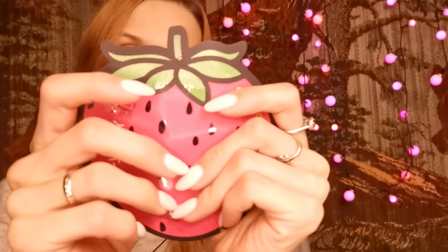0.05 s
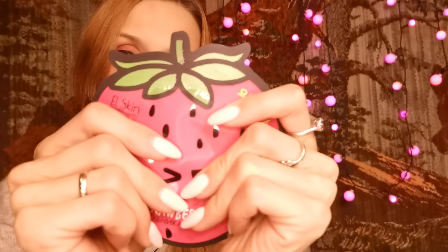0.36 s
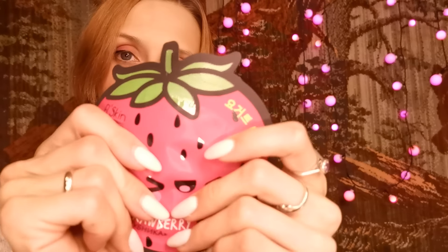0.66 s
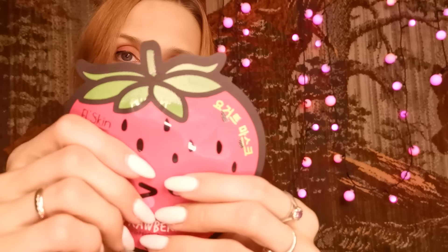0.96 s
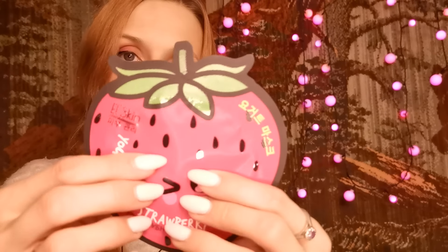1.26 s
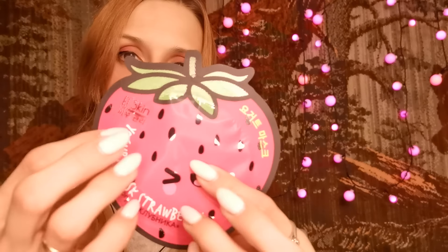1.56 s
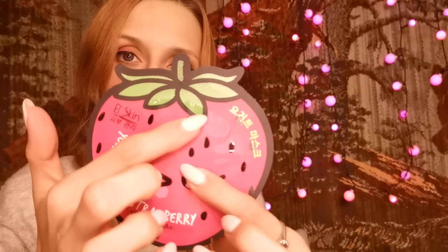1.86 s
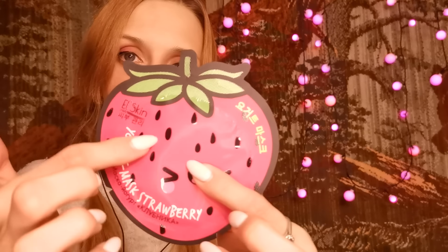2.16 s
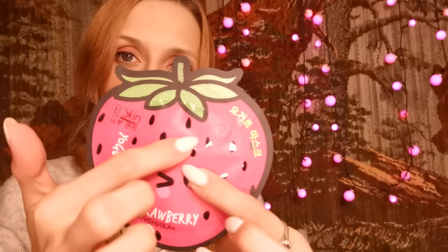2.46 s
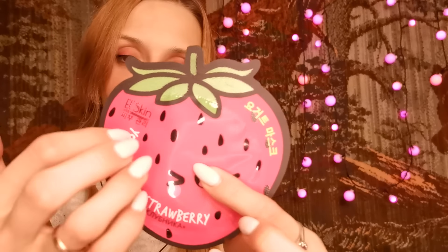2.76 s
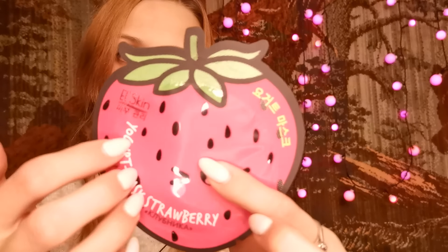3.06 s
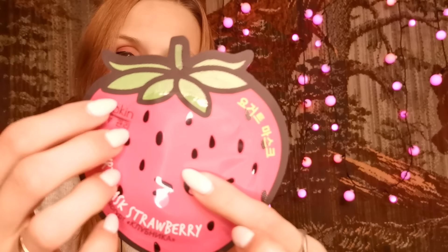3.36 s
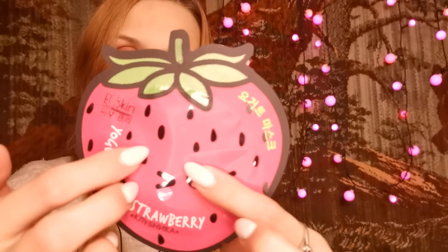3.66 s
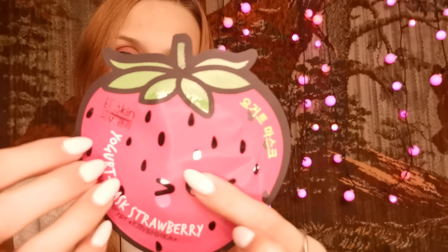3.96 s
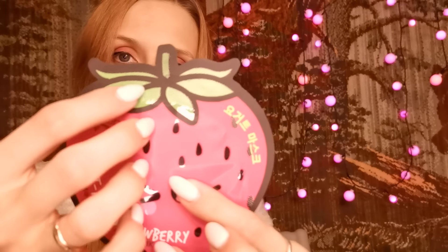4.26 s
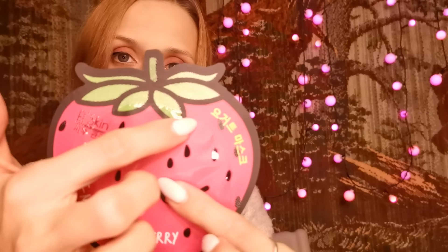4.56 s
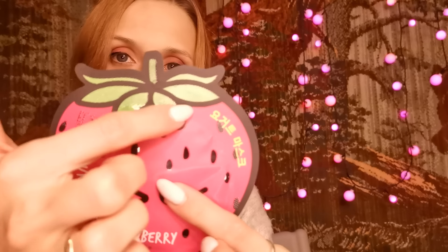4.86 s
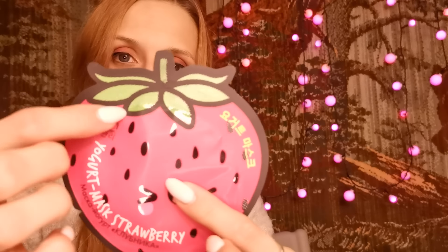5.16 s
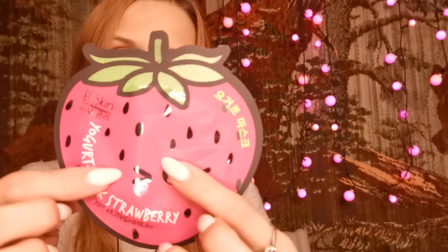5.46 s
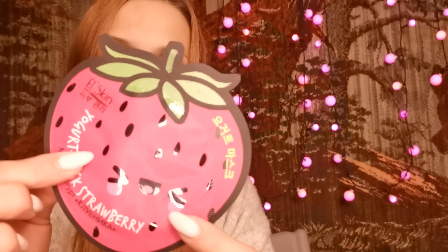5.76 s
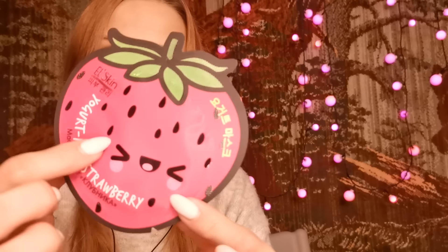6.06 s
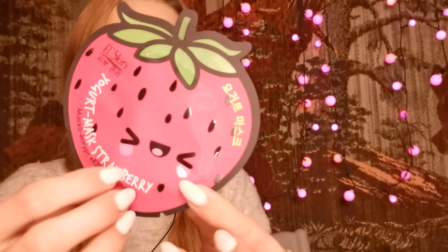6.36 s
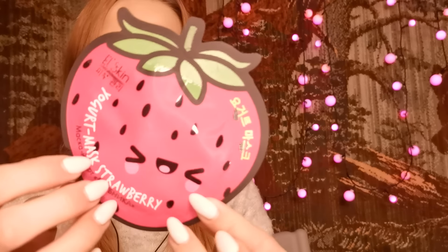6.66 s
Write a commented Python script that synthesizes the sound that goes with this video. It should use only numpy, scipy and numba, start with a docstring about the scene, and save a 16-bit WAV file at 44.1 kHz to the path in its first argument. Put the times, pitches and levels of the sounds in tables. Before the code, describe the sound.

Close, irregular nail taps on a plastic pouch, with soft finger thumps, hissing rubs and short, slightly squeaky scratches.

```python
"""Fingernails on a plastic sachet

Long nails tap, stroke and scratch a soft sachet close to a stereo microphone in a quiet room.
Impacts excite the modes of the film, and finger pads thump the pouch. Sliding friction hisses;
pressed nails stick and slip, driving modes that rise with tension. The flexing packet displaces
air in slow puffs."""
import sys
import numpy as np
from scipy import signal
from scipy.fft import rfft, irfft, next_fast_len
from scipy.io import wavfile
from scipy.ndimage import uniform_filter1d
from numba import njit

SR = 44100
rng = np.random.default_rng(int(sys.argv[2]) if len(sys.argv) > 2 else 0)


def transcribe(signal):
    """Save signal, clipped to [-1, 1], as a 16-bit WAV file at the path in sys.argv[1]."""
    frames = np.atleast_2d(signal).T
    limited = np.clip(frames, -1, 1)
    pcm = np.round(limited * 32767).astype(np.int16)
    wavfile.write(sys.argv[1], SR, pcm)


N = 295926
TIME = np.arange(N) / SR


# Nominal modes of the film, for taps and scratches: pitch_hz, width_hz, level_db
FILM_MODES = [(199, 54, 11), (402, 220, 4), (533, 8.8, 13), (900, 183, 2), (1102, 60, 1.5),
              (1550, 380, -24), (1900, 33, 9.5), (2188, 45, 5), (3300, 44, 6), (3900, 480, -10.5),
              (6250, 770, -14)]
# Nail impacts, knock and tick relative to the level: start_s, level_db, ring_hz, knock_db, tick_db
NAIL_TAPS = [(0.036, -45, 2700, 6, -10), (0.0631, -51, 2690, 11, -6), (0.0961, -38.5, 2860, 2, -6),
             (0.1475, -39.5, 1050, 0.5, -3), (0.176, -45.5, 2390, 6, -1), (0.2028, -44, 3800, 5, -14),
             (0.241, -41, 4100, 4, 4), (0.2534, -29.5, 1280, -48, -3.5), (0.2567, -47, 1210, 16.5, 13),
             (0.4328, -42, 2300, -4, -4), (0.463, -39.5, 1900, -8, -21), (0.488, -42, 1340, -25, 4),
             (0.529, -26, 2280, -9, -8.5), (0.601, -24.5, 3900, -2.5, -5), (0.896, -38, 2500, -18, 3.5),
             (1.0199, -21, 2600, -43, -15), (1.049, -26.5, 1860, 0.5, -27), (1.0583, -34, 1000, -3, -23),
             (1.1703, -42, 1090, 2, -21), (1.568, -48.5, 1540, -0.5, -14), (1.793, -53, 1870, -16, -23),
             (1.8898, -51.5, 1950, -12, -20), (2.239, -26, 2270, -3, -27),
             (2.5757, -23.5, 1980, -10.5, -44), (2.6829, -22, 1650, -10.5, -20.5),
             (2.8533, -25.5, 1380, -1, -8), (2.9157, -33, 3040, -5.5, -1.5),
             (2.9198, -30.5, 1860, -15.5, -28), (2.9432, -41.5, 3140, 0, -9), (3.282, -37.5, 1860, 4, -11),
             (3.4577, -32.5, 970, -4.5, -18), (3.473, -34, 3340, -3, -6), (3.771, -43.5, 2080, -1, -16),
             (3.98, -39.5, 1550, -53, -20), (4.0732, -31, 1820, -5, -0.5), (4.16, -35, 1590, -3, -28),
             (4.2074, -46.5, 3500, 6, 5), (4.232, -25, 3770, -5.5, -6), (4.4425, -32.5, 1960, -12, -6),
             (4.7384, -32, 2200, -11, -10), (4.8885, -35, 2240, -21, -5), (4.9867, -41, 2500, 1, -9),
             (5.2289, -35, 2760, -6, 0.5), (5.967, -51.5, 3880, -5, 10.5), (6.2429, -27.5, 3910, -12.5, -3),
             (6.2616, -37.5, 1100, 1.5, -12), (6.2746, -38.5, 1990, -2, -2.5), (6.377, -57, 1000, 18, 10),
             (6.552, -36.5, 3980, 4, 5.5), (6.5637, -40, 2030, -5, -2), (6.6136, -43, 1900, -29, -21)]

def nail_taps(ring_s=0.00092, damping_hz=60, tick_s=0.0013, tick_trim_db=-1, spike_db=-6):
    """Impact excitation: a contact tick, a clack of the struck spot and a low knock of the film."""
    out, t = np.zeros((2, N)), np.arange(2048) / SR
    hz, width, mode_db = np.transpose(FILM_MODES)[:, :, None]
    for start_s, level_db, ring_hz, knock_db, tick_db in NAIL_TAPS:
        # every spot has its own tension and its own share of each mode
        place = rng.standard_normal((2, len(FILM_MODES), 1))
        tuning, shares = 1 + .09 * place[0], undb(mode_db + 4 * place[1])
        modes = np.exp(-np.pi * (width + damping_hz) * t) * np.cos(2 * np.pi * hz * tuning * t)
        film = -np.sum(width * shares * modes, axis=0)
        spot = -np.exp(-t / ring_s) * np.sin(2 * np.pi * ring_hz * t)
        # the less a tap drives the whole film, the more its own spot rings
        spot = undb(-0.26 * knock_db) * equal_energy(band(spot, 480, 2850))
        clack = equal_energy(equal_energy(band(film, 1033, 3520, order=5)) + spot)
        knock = equal_energy(band(film, 175, 900))
        # first touch is one hard spike, followed by a brief scuff
        scuffs = [equal_energy(c * np.exp(-t / tick_s)) for c in rng.standard_normal((2, len(t)))]
        touch = scuffs[0] - undb(spike_db) * equal_energy(1. * (t == 0))
        mid, side = (equal_energy(band(band(c, 3200, 18000), 3400, 6000, order=1))
                     for c in (touch, scuffs[1]))
        tick = undb(tick_db + tick_trim_db) * stereo(mid, 0.39 * side)
        add(out, start_s, undb(level_db) * (clack + undb(knock_db) * knock + tick))
    return out


# Finger pads landing on the pouch: start_s, level_db, pitch_hz
PAD_THUMPS = [(0.25, -20, 66.7), (0.354, -26, 62.6), (0.402, -31.5, 139), (0.601, -20.5, 174),
              (0.71, -25, 68.4), (0.828, -28.5, 96.5), (0.889, -23, 60), (0.98, -33, 237),
              (1.055, -22.5, 150), (1.173, -28, 109), (1.408, -24.5, 87), (1.933, -35, 65.3),
              (2.237, -24.5, 87.5), (2.341, -26.5, 102), (2.579, -25, 95), (2.68, -20.5, 116),
              (2.86, -18.5, 80.4), (2.918, -19, 59.4), (3.03, -26.5, 117), (3.456, -23, 136),
              (3.508, -33.5, 434.5), (3.553, -31, 310), (3.923, -28.5, 105), (4.019, -26.5, 86),
              (4.073, -15.5, 89), (4.213, -21.5, 74), (4.239, -21, 165), (4.696, -33, 124),
              (4.741, -25, 111), (5.226, -25.5, 99), (5.574, -28, 117), (5.671, -24, 74),
              (5.953, -29, 79.4), (6.255, -25.5, 83), (6.464, -32, 119), (6.55, -23.5, 127),
              (6.579, -26.5, 67)]

def pad_thumps(rise_cycles=0.39, trim_db=-.5, pan_db=-2.0, crumple=0.17):
    """Damped oscillation: the pouch yields and swings back in a cycle or two, crumpling unevenly."""
    out, t = np.zeros((2, N)), np.arange(4096) / SR
    for start_s, level_db, pitch_hz in PAD_THUMPS:
        age = pitch_hz * t / rise_cycles
        envelope = age * np.exp(1 - age)
        folds = unit_rms(band(rng.standard_normal(len(t)), pitch_hz, 2 * pitch_hz, order=1))
        swing = -envelope ** 2 * np.sin(2 * np.pi * pitch_hz * t) + crumple * envelope * folds
        add(out, start_s, pan(undb(level_db + trim_db) * swing, pan_db + rng.standard_normal()))
    return out


# Drags of a pressed nail, one curve each: time_s, level_db, pitch_hz, slip_rate_hz, ring_hz, squeak_db
NAIL_DRAGS = [
    [(1.015, -28.5, 286, 560, 2750, 14), (1.03, -30.5, 270, 390, 2540, 6)],
    [(3.28, -43, 379, 394, 1850, 14), (3.32, -35, 426.6, 502, 1820, 4), (3.355, -33, 413.2, 507, 2250, 5.5),
     (3.382, -30.5, 334.4, 240, 2100, 10.5), (3.425, -33, 318.2, 162, 1850, -8),
     (3.445, -41, 312, 122, 990, -12), (3.48, -40, 296, 92, 900, -9)],
    [(4.035, -39, 348, 210, 1790, -4), (4.076, -31.5, 343.3, 174, 1840, 10)],
    [(4.238, -31, 184, 166, 890, 4), (4.275, -41.5, 188, 193, 1020, -30),
     (4.325, -35.5, 206, 238, 1220, -14), (4.37, -37.5, 195.4, 176, 1150, -4),
     (4.415, -37, 199.3, 150, 1400, 3), (4.447, -39, 190.3, 109, 2000, 11),
     (4.47, -43.5, 179.5, 137, 2000, -3), (4.508, -43.5, 167.2, 130, 2480, 2)],
    [(4.544, -37, 171.8, 230, 3440, 4), (4.564, -46, 161, 220, 3560, 11)],
    [(4.682, -39, 162.7, 140, 2200, -9), (4.72, -37.5, 173.7, 141, 2200, -10),
     (4.775, -43, 162, 118, 2150, -10)],
    [(4.862, -47, 172.1, 145, 2100, -3), (4.925, -39, 174, 136, 3180, 1),
     (4.955, -31.5, 163.9, 104, 2650, 3.5), (4.998, -47, 156, 103, 2200, 1)],
    [(5.375, -48, 168.5, 290, 2380, 24), (5.405, -39, 172, 320, 3270, 10)],
    [(5.583, -43, 180, 220, 1190, 6), (5.62, -44, 186, 162, 1390, 17)],
]

def scratches(waver=0.016, locked_jitter=.07, loose_jitter=.35, grit_db=-10, grit_cycles=0.28,
              spot_width_hz=550., overtone=1.85, overtone_db=-11, drum_db=5.5, snap_db=-6):
    """Stick-slip friction: each slip snaps, rings the spot and drives modes that rise with tension."""
    out, wobble, stagger = np.zeros(N), np.exp(waver * flutter(70)), flutter(200)
    sizes, grains = scatter(3), rng.standard_normal(N)
    for drag in NAIL_DRAGS:
        on, contact, _ = gesture(drag[0][0], drag[-1][0] - drag[0][0], .5)
        level_db, pitch_hz, rate_hz, ring_hz, squeak_db = (c[on] for c in curves(drag))
        # slips lock to the film near its pitch and stumble away from it
        jitter = locked_jitter + loose_jitter * np.minimum(np.abs(np.log2(rate_hz / pitch_hz)), 1)
        pitch_hz = pitch_hz * wobble[on]
        phase = np.cumsum(rate_hz * np.exp(jitter * stagger[on])) / SR
        slips = np.diff(np.floor(phase), prepend=0) * sizes[on] * np.sqrt(SR / rate_hz)
        # the faster the nail slides, the more grit lies between the slips
        grit = unit_rms(grains[on] * np.exp(-(phase % 1) / grit_cycles)) * undb(grit_db) * rate_hz / 200
        force, snap = band(grit - slips, 54, 5200), band(grit - slips, 300, 7000)
        # an inverted return every half period leaves the odd overtones
        wave = rebound(force, SR / (2 * pitch_hz), share=.65, damping=.4)
        stretch = 1.04 * np.sqrt(pitch_hz / pitch_hz.max())
        film = sum(undb(db) * resonate(wave, hz * stretch, float(width)) for hz, width, db in FILM_MODES)
        ring, upper = (resonate(resonate(force, hz, spot_width_hz), hz, spot_width_hz)
                       for hz in (ring_hz, overtone * ring_hz))
        squeak = undb(6 + squeak_db) * (ring + undb(overtone_db) * upper)
        drum = undb(drum_db) * resonate(wave, pitch_hz, width_hz=40.)
        scratch = band(film, 240, 12000, order=1) + undb(snap_db) * snap + squeak + drum
        # the push of the finger sets the power, however the slips fall
        power = uniform_filter1d(band(scratch, 400, 4500) ** 2, 1300)
        out[on] += scratch / np.sqrt(power + 1e-12) * contact * undb(level_db)
    side = undb(-2) * shape(band(np.roll(out, 13), 1000, 15000), STEREO_WIDTH)
    return stereo(out, side)


@njit
def rebound(x, lag, share, damping):
    """Boundary reflection: a wave returns from the film's edge inverted and duller, over and over."""
    y, dulled = x.copy(), 0.
    for i in range(len(x)):
        at = i - lag[i]
        if at > 0:
            k = int(at)
            returned = y[k] + (at - k) * (y[k + 1] - y[k])
            dulled += (1 - damping) * (returned - dulled)
            y[i] -= share * dulled
    return y


# Light strokes, rasp relative to hiss: start_s, length_s, crest_fraction, hiss_db, rasp_db
LIGHT_STROKES = [(0, 0.03, 0.044, -43.5, 1), (0.057, 0.1, 0.19, -44.5, 1), (0.172, 0.11, 0.99, -45.5, 4.5),
                 (0.23, 0.16, 0.56, -43.5, 3), (0.349, 0.01, .5, -29.5, -4), (0.442, 0.014, 0.41, -33, -2),
                 (0.482, 0.016, 0.66, -39, 5.5), (0.52, 0.16, 0.37, -40.5, 2),
                 (0.675, 0.22, 0.6, -39.5, -1), (0.88, 0.3, 0.11, -47, 1), (0.929, 0.014, 0.46, -34.5, 2),
                 (0.971, 0.014, 0.55, -36, 6), (1.057, 0.069, 0.34, -38, 1), (1.116, 0.12, 0.29, -40, -10),
                 (1.224, 0.19, 0.27, -45.5, -0.5), (1.369, 0.15, 0.42, -40.5, -11),
                 (1.529, 0.076, 0.63, -54, -1), (1.611, 0.036, 1, -55, 8.5), (1.93, 0.27, 0.23, -45, -5.5),
                 (2.18, 0.2, 0.67, -53.5, 7), (2.358, 0.17, 0.39, -46, -4.5), (2.479, 0.17, 0.33, -47, 1),
                 (2.668, 0.06, 0.13, -51.5, 6.5), (2.909, 0.25, 0.44, -50.5, 1),
                 (3.159, 0.18, 0.97, -49.5, -1.5), (3.276, 0.11, 0.68, -39.5, 3.5),
                 (3.391, 0.17, 0.22, -44.5, 1), (3.543, 0.27, 0.26, -49.5, 1), (3.801, 0.15, 1, -48, 1.5),
                 (3.962, 0.061, 1, -50.5, -2), (4.04, 0.029, 0.59, -40.5, 2), (4.215, 0.27, 0.51, -44, 7),
                 (4.466, 0.14, 0.17, -41.5, -1), (4.668, 0.12, 0.35, -43, 1), (4.823, 0.16, 0.74, -49, 5.5),
                 (5.081, 0.1, 0.47, -55.5, 6), (5.191, 0.13, 0.35, -54.5, 5.5), (5.325, 0.026, 1, -46, 3.5),
                 (5.379, 0.15, 0.4, -45, -2.5), (5.57, 0.059, 0.47, -38, -3),
                 (5.615, 0.088, 0.92, -43, -6.5), (5.675, 0.11, 0.14, -59.5, 8),
                 (5.814, 0.087, 0.63, -48, -1), (5.99, 0.064, 0.8, -52, 1.5),
                 (6.057, 0.17, 0.25, -56, -0.5), (6.246, 0.074, 0.25, -48.5, -2),
                 (6.32, 0.2, 0.22, -51.5, -4.5), (6.555, 0.066, 0.41, -46.5, -15),
                 (6.685, 0.058, 0.79, -45, -7)]

def friction(slowest_db=-4.5):
    """Friction noise grows with sliding speed: the hiss gain, rasp gain and speed of all strokes."""
    hiss_power, rasp_power, fastest = np.zeros((3, N))
    for start_s, length_s, crest, hiss_db, rasp_db in LIGHT_STROKES:
        on, contact, speed = gesture(start_s, length_s, crest)
        gain = contact * undb(hiss_db + slowest_db * (1 - speed))
        hiss_power[on] += gain ** 2
        rasp_power[on] += (gain * undb(rasp_db)) ** 2
        fastest[on] = np.maximum(fastest[on], speed)
    return np.sqrt(hiss_power), np.sqrt(rasp_power), fastest


# Bright resonance that moves with the fingers: time_s, pitch_hz
SHEEN_PATH = [(0, 6200), (.9, 6700), (1.15, 7700), (1.3, 6100), (1.5, 7700), (1.95, 11100), (2.65, 11900),
              (2.95, 8004), (3.4, 6600), (4.5, 6940), (5.5, 7900), (6.7, 6800)]
# Spectra of the high and the low friction noise: frequency_hz, level_db
HISS_SPECTRUM = [(2000, -22), (3800, -8), (5500, -3), (7500, -2), (9500, -3), (12000, -1.5), (14000, -7.5),
                 (16000, -25)]
RASP_SPECTRUM = [(100, 7), (250, -1), (500, -10), (800, -7.5), (1400, -7), (2000, -3), (2800, -3),
                 (3700, -4), (5000, -6.5), (7500, -34)]

def strokes(hiss_gain, rasp_gain, speed, slow_ring_hz=2200, rise_octaves=0.51, uneven_db=1.5):
    """Roughness noise: fingers drag unevenly over the film, which rings higher as they speed up."""
    sheen_hz, = curves(SHEEN_PATH)
    hiss = noise(HISS_SPECTRUM, grain=0.12)
    hiss = nail_edge(hiss) + 0.7 * resonate_pair(hiss, sheen_hz, width_hz=1800)
    hiss = hiss / np.std(hiss.mean(axis=0))
    ring_hz = slow_ring_hz * 2 ** (rise_octaves * speed)
    rasp = noise(RASP_SPECTRUM, grain=0.48)
    rasp = rasp + 0.48 * resonate_pair(rasp, ring_hz, width_hz=550)
    rasp = rasp / np.std(rasp.mean(axis=0))
    rubbing = pan(hiss, -0.84) * hiss_gain + pan(rasp, 0.58) * rasp_gain
    return hand_reflection(rubbing) * undb(uneven_db * (flutter(220) + flutter(40)))


def nail_edge(x, share=0.38, drift=.07, swell_db=4):
    """Resonance of the nail edge: six treble peaks wander and swell independently as it turns."""
    out = x
    for hz in np.geomspace(3500, 12500, 6):
        centre_hz = hz * np.exp(drift * flutter(8))
        gain = share * undb(swell_db * np.clip(flutter(16), -2, 2))
        out = out + gain * resonate_pair(x, centre_hz, width_hz=800)
    return out


def hand_reflection(x, delay_s=.0006, share=.18):
    """Comb filtering: the moving hands return a faint copy over a changing path."""
    n = np.arange(N)
    lag = SR * delay_s * np.exp(.15 * flutter(3))
    return np.array([c + share * np.interp(n - lag, n, c) for c in x])


def crinkles(drag_gain, rate_hz=35, level_db=-11):
    """Buckling: tiny creases snap while the fingers drag over the film."""
    snaps = (rng.random(N) < rate_hz / SR) * scatter(3)
    return unit_rms(band(snaps, 810, 6800)) * drag_gain * undb(level_db)


def crackle(hiss_gain, rate_hz=80, level_db=-10):
    """Micro-impacts: nail edges catch on the grain of the film with fine, bright ticks."""
    ticks = (rng.random(N) < rate_hz / SR) * scatter(5)
    lean = np.clip(1.4 * rng.standard_normal(N), -1, 1)
    return unit_rms(band(ticks * stereo(1, lean), 2600, 18000)) * hiss_gain * undb(level_db)


# Spectrum of the air pushed by the packet: frequency_hz, level_db
PUFF_SPECTRUM = [(12, 1.5), (28, 3), (50, -3.5), (80, -8), (130, -17.5), (220, -27.5), (400, -35),
                 (900, -49.5)]

def air_puffs(rasp_gain, rest_db=-44, stroke_db=-7.5, thump_db=-12.5, settle_s=0.051, swing_db=6):
    """Air displacement: the swaying packet puffs slowly, more under strokes and after thumps."""
    pushes = np.zeros(N)
    for start_s, level_db, _ in PAD_THUMPS:
        pushes[int(start_s * SR)] += undb(level_db + thump_db)
    settling = signal.lfilter([1], [1, -np.exp(-1 / (settle_s * SR))], pushes)
    rocking = uniform_filter1d(settling, size=512)
    flex = np.sqrt(undb(rest_db) ** 2 + (undb(stroke_db) * rasp_gain) ** 2 + rocking ** 2)
    return pan(noise(PUFF_SPECTRUM), -1.9) * flex * undb(swing_db * np.tanh(flutter(13)))


def reverberation(x, t60_s=0.56, wet_db=-27):
    """Diffuse reflection: a small, well furnished room adds a faint exponential tail."""
    t = np.arange(SR // 2) / SR
    decay = np.exp(-np.log(1000) * t / t60_s) * (t > .003)
    tails = band(rng.standard_normal((2, len(t))), 220, 6600) * decay
    tails = tails / np.sqrt(np.sum(tails ** 2) / 2)
    return undb(wet_db) * signal.fftconvolve(x, tails, axes=1)[:, :N]


# Spectrum of the still room: frequency_hz, level_db
ROOM_SPECTRUM = [(25, -22), (60, -19), (150, -19), (300, -3.5), (700, -8.5), (2000, -17), (6000, -50),
                 (16000, -34)]

def room_tone(level_db=-61):
    """Stationary noise: the steady background of the room."""
    return undb(level_db) * noise(ROOM_SPECTRUM)


# Side relative to mid; wide in the low mids and treble, nearly mono around 2.5 kHz: frequency_hz, side_db
STEREO_WIDTH = [(30, -8.5), (120, -5), (400, -3), (1200, -8.5), (2500, -30), (4500, -13), (8000, -5.5),
                (15000, -4.5)]

def noise(spectrum, grain=0.):
    """Partly coherent stereo noise; grain makes a few micro-contacts stand out."""
    sizes = np.exp(grain * rng.standard_normal(N))
    mid, side = (unit_rms(shape(sizes * rng.standard_normal(N), spectrum)) for _ in range(2))
    return stereo(mid, shape(side, STEREO_WIDTH))


def gesture(start_s, length_s, crest, land_s=.005, lift_s=.007):
    """Envelopes of one finger move: its samples, its contact and its speed, peaking at the crest."""
    on = slice(*np.searchsorted(TIME, [start_s - 5 * land_s, start_s + length_s + 5 * lift_s]))
    age, crest_s = TIME[on] - start_s, np.clip(crest, .05, .95) * length_s
    landing = .5 * (1 + np.tanh(.5 * age / land_s))
    lifting = .5 * (1 + np.tanh(.5 * (length_s - age) / lift_s))
    speed = 1 - np.interp(age, [0, crest_s, length_s], [1, 0, 1]) ** 0.98
    return on, landing * lifting, speed


@njit
def resonate(x, hz, width_hz):
    """Second-order resonance with a moving centre and gain 1 at the peak."""
    y, band_state, low_state = np.empty(len(x)), 0., 0.
    for i in range(len(x)):
        step, loss = np.tan(np.pi * hz[i] / SR), width_hz / hz[i]
        velocity = (band_state + step * (x[i] - low_state)) / (1 + step * (step + loss))
        band_state = 2 * velocity - band_state
        low_state += 2 * step * velocity
        y[i] = loss * velocity
    return y


def resonate_pair(x, hz, width_hz):
    """The same resonance in both channels."""
    return np.array([resonate(c, hz, float(width_hz)) for c in x])


def shape(x, spectrum):
    """Spectral weighting by (frequency_hz, level_db) points."""
    hz, db = np.transpose(spectrum)
    size = next_fast_len(len(x))
    bins_hz = np.maximum(np.fft.rfftfreq(size, 1 / SR), 1)
    gain = undb(np.interp(np.log(bins_hz), np.log(hz), db))
    return irfft(rfft(x, size) * gain, size)[:len(x)]


def band(x, lo_hz, hi_hz, order=2):
    """Causal band-pass filtering."""
    return signal.sosfilt(signal.butter(order, [lo_hz, hi_hz], "band", fs=SR, output="sos"), x)


def flutter(rate_hz):
    """Smooth random modulation with a spread near 1."""
    steps = rng.standard_normal(N // 16)
    return 1.2 * np.interp(TIME * rate_hz, np.arange(len(steps)), steps)


def scatter(spread_db):
    """Clipped log-normal gains, one a sample."""
    return undb(spread_db * np.clip(rng.standard_normal(N), -2, 2))


def curves(rows):
    """Linear interpolation of each column through time."""
    time_s, *columns = np.transpose(rows)
    return [np.interp(TIME, time_s, c) for c in columns]


def undb(db):
    """Decibels to gain."""
    return 10 ** (np.asarray(db) / 20)


def unit_rms(x):
    """Normalisation to rms 1."""
    return x / np.sqrt(np.mean(x ** 2) + 1e-20)


def equal_energy(x):
    """Normalisation to the energy of 5 ms at rms 1."""
    return x * np.sqrt(.005 * SR / np.sum(x ** 2))


def stereo(mid, side):
    """Sum and difference give left and right."""
    return np.array([mid + side, mid - side])


def pan(x, db):
    """Placement by level difference, left minus right."""
    return x * undb(np.array([[db], [-db]]) / 2)


def add(out, start_s, sound):
    """Superpose a short stereo sound."""
    i = int(np.clip(start_s * SR, 0, N - 1))
    out[:, i:i + sound.shape[1]] += sound[:, :N - i]


def scene(grip_hiss_db=-65, grip_rasp_db=-64.5):
    """Superposition of fingers, air and room; the holding hand always rubs a little."""
    hiss_gain, rasp_gain, speed = friction()
    hiss_gain = np.hypot(hiss_gain, undb(grip_hiss_db))
    rasp_gain = np.hypot(rasp_gain, undb(grip_rasp_db))
    fingers = nail_taps() + pad_thumps() + strokes(hiss_gain, rasp_gain, speed) + scratches()
    fingers = fingers + crinkles(np.minimum(hiss_gain, rasp_gain)) + crackle(hiss_gain)
    return fingers + reverberation(fingers) + air_puffs(rasp_gain) + room_tone()


def record(dry, top_hz=16200):
    """Band limiting: a steep low-pass cuts the top of the treble."""
    return signal.sosfilt(signal.ellip(10, .1, 80, top_hz, fs=SR, output="sos"), dry)


dry = scene()
out = record(dry)
transcribe(out)
```